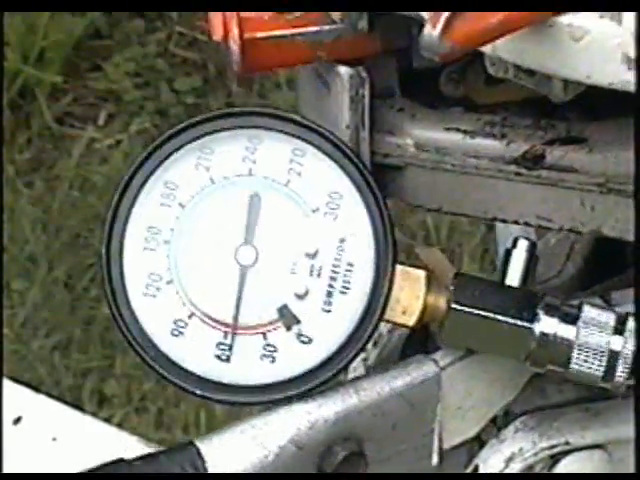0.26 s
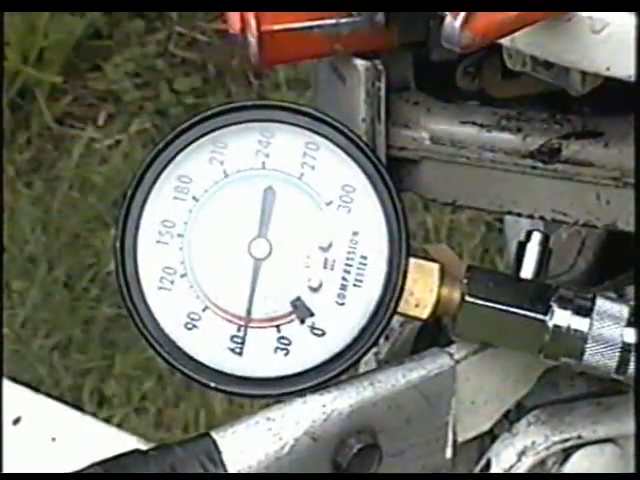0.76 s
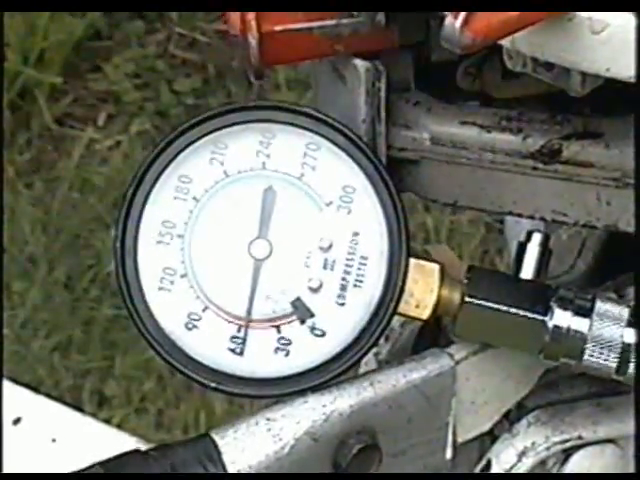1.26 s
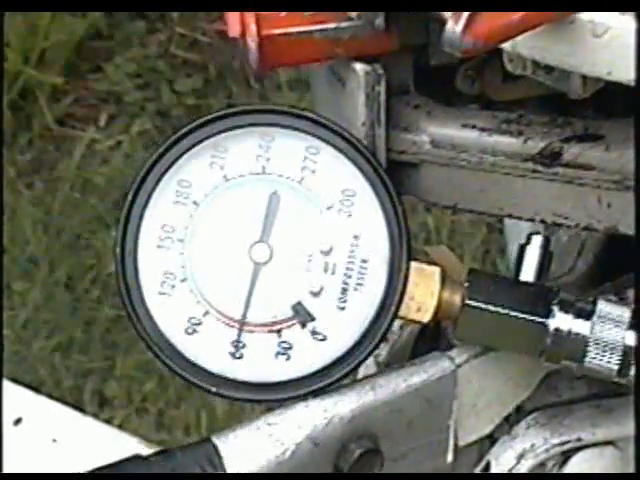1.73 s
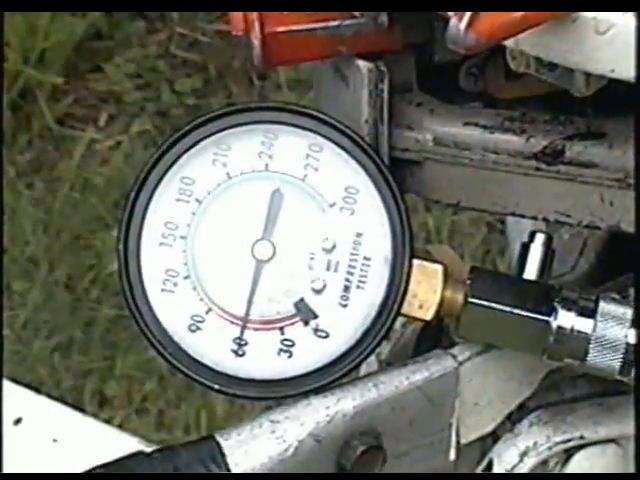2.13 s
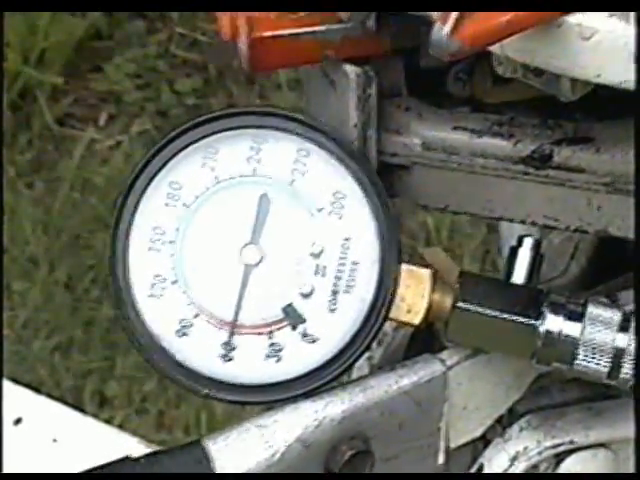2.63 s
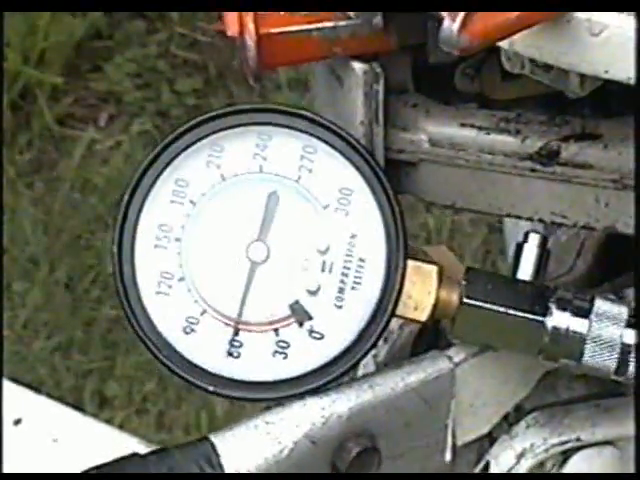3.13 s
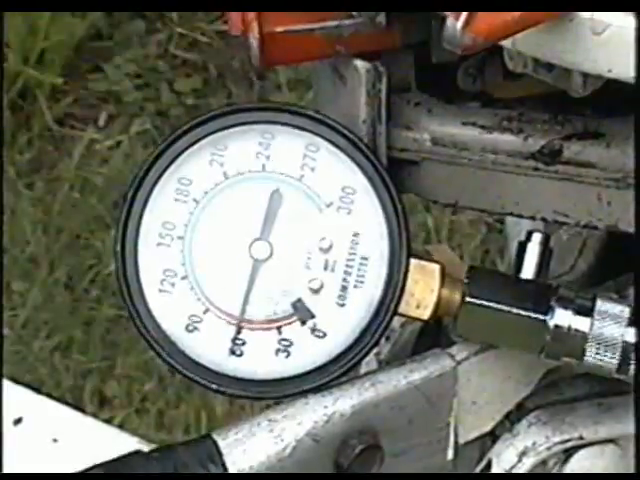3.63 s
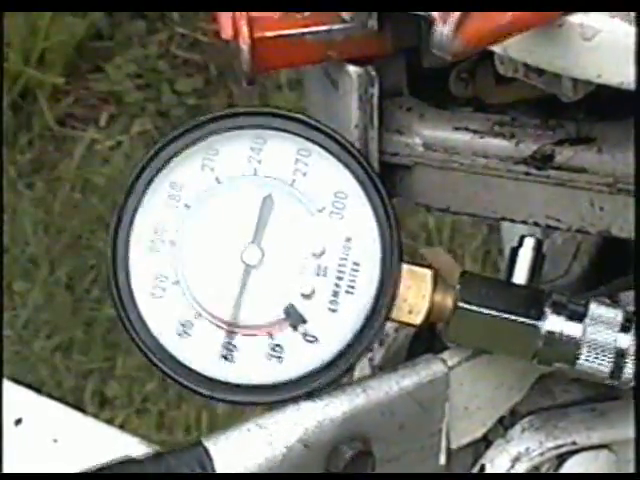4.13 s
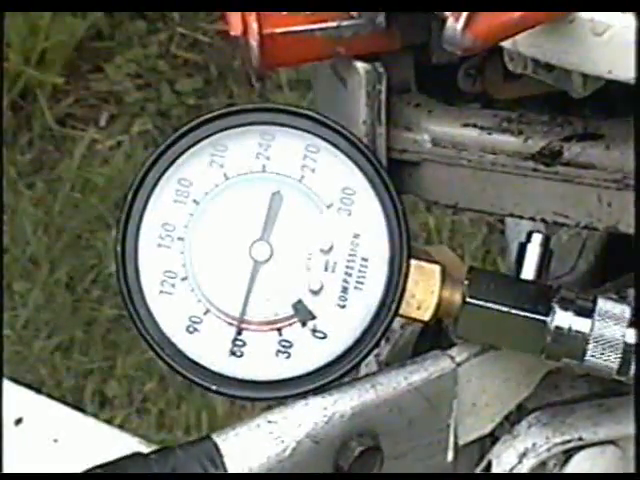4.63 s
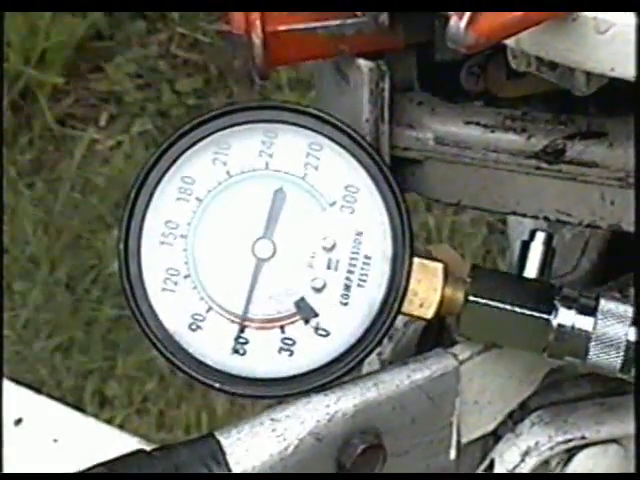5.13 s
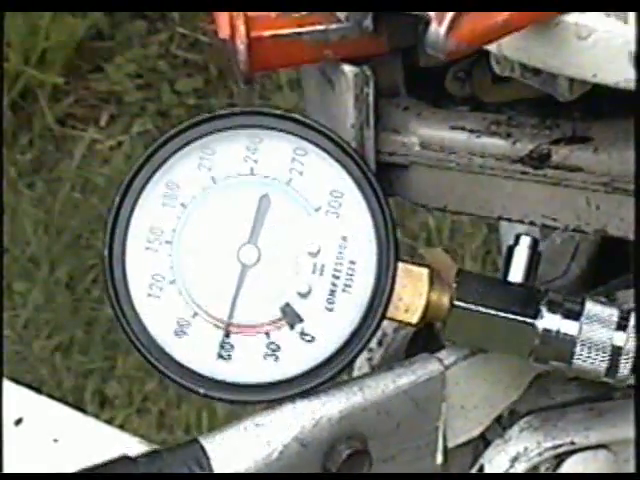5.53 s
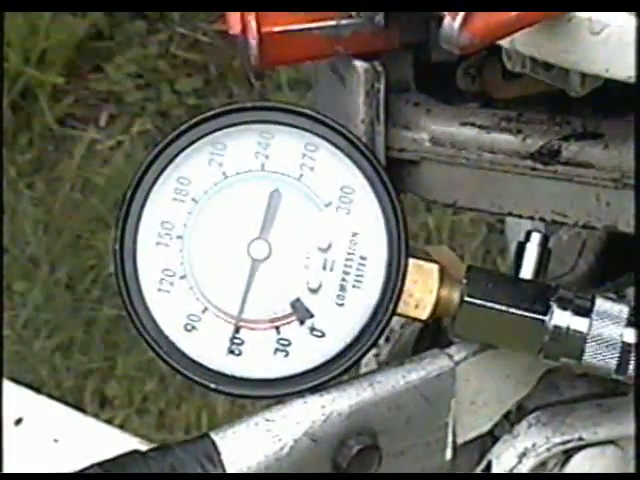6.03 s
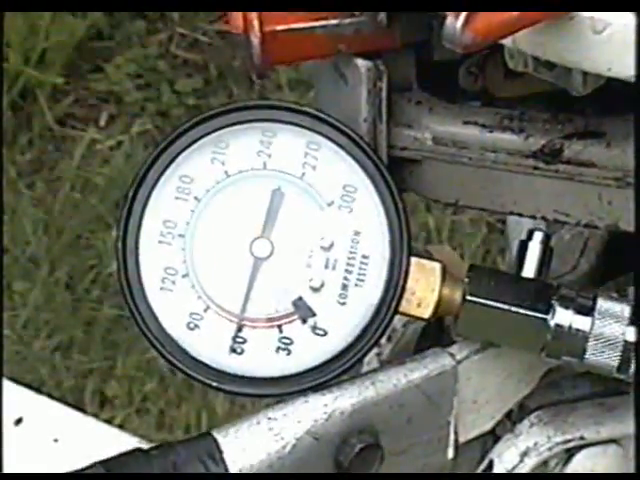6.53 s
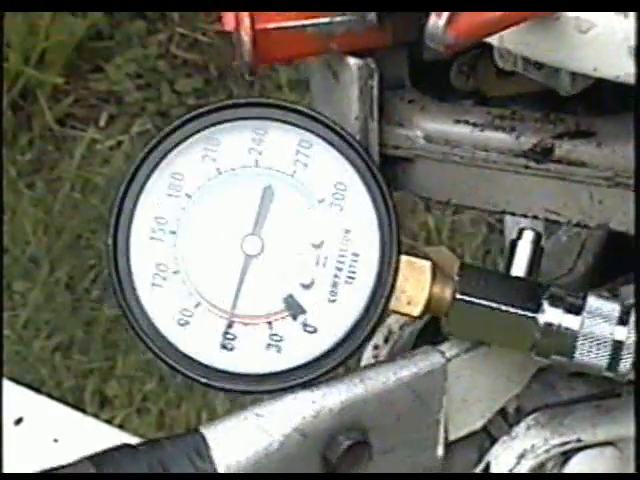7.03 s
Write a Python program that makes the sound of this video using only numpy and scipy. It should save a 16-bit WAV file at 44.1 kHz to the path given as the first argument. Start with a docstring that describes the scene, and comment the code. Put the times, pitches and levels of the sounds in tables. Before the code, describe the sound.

A hand-pulled starter rope whirrs and clacks six times on a small engine that never fires, each rewind scraping back to a knocking slap.

```python
"""Cranking a small outboard motor by hand

A small outboard motor is cranked six times by its recoil rope for a compression test and never fires.
Each pull whirrs as friction noise in the resonant starter housing, throbs in the exhaust's air column and
ends in a clack; gulped air chirps. The spring then drags the scraping, singing rope back, and five times the
handle slaps home on a ringing cowl. Quiet air and hum lie beneath; the sound cuts out briefly four times."""
import sys
import numpy as np
from scipy import signal
from scipy.fft import rfft, irfft
from scipy.io import wavfile
from scipy.ndimage import uniform_filter1d

SR = 44100
rng = np.random.default_rng(int(sys.argv[2]) if len(sys.argv) > 2 else 0)


def transcribe(u):
    """Save the signal u as a 16-bit wav file named by the first command-line argument.

    u: samples, shape (n,) or (channels, n), limited to [-1, 1]; the rate is SR.
    q: integer samples, one column per channel.
    """
    v = np.clip(np.atleast_2d(u).T, -1, 1)
    q = np.round(v * 32767).astype(np.int16)
    wavfile.write(sys.argv[1], SR, q)


N = 320739
TIME = np.arange(N) / SR

# Pulls of the rope: (start [s], time to reach speed [s], stop [s],
# relative rattle level [dB], relative rope hiss level [dB])
PULLS = [(0.146, 0.067, 0.47, -27.5, -33), (1.455, 0.057, 1.76, -29, -33),
         (2.733, 0.085, 3.014, -28.5, -31.5), (4.084, 0.11, 4.317, -27, -30),
         (5.42, 0.069, 5.718, -29.5, -32.5), (6.815, 0.097, 7.12, -28.5, -31.5)]
# Resonances of the starter housing: (frequency [Hz], width [Hz], lift [dB])
HOUSING = [(365.4, 58, 5.5), (401, 77, 3), (740, 24, 1.5), (830, 42, 1), (982, 65, 8.5), (1099, 40, 7),
           (1460, 72, 4.5), (1670, 50, 1.5), (2290, 64, 2), (2490, 220, 3.5), (6560, 560, 4.5),
           (7940, 140, 7)]
# Spectrum of the rewinding rope and reel: (frequency [Hz], relative density [dB])
SCRAPE_SPECTRUM = [(120, -51.5), (200, -10.5), (310, -22.5), (388, 1.5), (496, -6.5), (679, -10.5),
                   (1050, -4), (1210, -8.5), (1520, -6), (2040, -13), (2470, -7), (3450, -13.5), (6580, -8),
                   (10900, -21.5), (13000, -54)]


def amp(db):
    """Level definition: decibels to amplitude gain."""
    return 10 ** (np.asarray(db) / 20)


def unit(x):
    """Power normalisation: scales to rms 1."""
    return x / np.sqrt(np.mean(x ** 2) + 1e-20)


def read(points, hz):
    """Interpolates a table along a logarithmic frequency axis."""
    f, value = np.transpose(points)
    return np.interp(np.log(hz + 1), np.log(f + 1), value)


def add(mix, s, sound):
    """Superposition: adds a sound to the mix from time s."""
    part = mix[max(round(s * SR), 0):][:len(sound)]
    part += sound[:len(part)]


def wander(hz):
    """Low-passed noise: a slow random fluctuation of rms 1, up to about hz."""
    spectrum = rfft(rng.standard_normal(N))
    lowpass = 1 / (1 + (np.fft.rfftfreq(N, 1 / SR) / hz) ** 4)
    return unit(irfft(spectrum * lowpass, N))


def band(x, hz, kind):
    """Butterworth filtering: low-pass or high-pass at hz."""
    return signal.sosfilt(signal.butter(4, hz, kind, fs=SR, output="sos"), x)


def ease(s, rise):
    """Gaussian onset: leaves 0 at time s and nears 1 in about rise seconds."""
    return 1 - np.exp(-(np.maximum(TIME - s, 0) / rise) ** 2)


def release(s, t60):
    """Exponential decay: holds at 1 until time s, then falls 60 dB in t60 seconds."""
    return np.exp(-np.log(1000) * np.clip((TIME - s) / t60, 0, 2))


def colour(x, spectrum, resonances=(), size=8192):
    """Minimum-phase filtering: a broad spectrum with resonances on top, of energy 1."""
    hz = np.fft.rfftfreq(size, 1 / SR)
    db = read(spectrum, hz)
    db = db + sum(lift / (1 + (2 * (hz - f) / width) ** 2) for f, width, lift in resonances)
    log_gain = np.log(amp(np.r_[db, db[-2:0:-1]]))
    # the Hilbert transform of the log gain supplies the phase of a causal filter
    taps = np.fft.ifft(np.exp(np.conj(signal.hilbert(log_gain)))).real[:size // 2]
    return signal.oaconvolve(x, taps / np.linalg.norm(taps))[:N]


def resonate(x, hz, width):
    """Heterodyning: a resonance of gain 1 whose centre follows the curve hz."""
    turn = np.exp(2j * np.pi * np.cumsum(hz) / SR)
    r = np.exp(-np.pi * width / SR)
    shifted_down = signal.lfilter([1 - r], [1, -r], x / turn)
    return 2 * (turn * shifted_down).real


def note_of(hz, width):
    """Narrow-band noise: two equal resonances in series make a fuzzy note."""
    once = resonate(rng.standard_normal(N), hz, width)
    return unit(resonate(once, hz, width))


def grains(per_s, spread_db, flutter_db, flutter_hz):
    """Dry friction as shot noise: dense tiny clicks of uneven size that come in clumps."""
    size = amp(spread_db * np.minimum(rng.exponential(1, N), 4)) * rng.standard_normal(N)
    struck = rng.random(N) < per_s / SR
    return unit(size * struck * amp(flutter_db * wander(flutter_hz)))


def tinkle(per_s, width):
    """Impulsive excitation: scattered contacts ring at 18 gently wavering pitches, per_s on each."""
    total = np.zeros(N)
    for hz in np.linspace(700, 9500, num=18):
        size = amp(2 * np.minimum(rng.exponential(1, N), 4))
        contacts = size * (rng.random(N) < per_s / SR) * rng.choice([-1., 1.], N)
        waver = np.sin(2 * np.pi * (rng.uniform(3, 9) * TIME + rng.random()))
        total += resonate(contacts, hz * (1 + .06 * waver), width)
    return unit(total)


def rubbing(drive, spectrum, body_gain, hiss_gain):
    """Friction filtered by the housing's resonances; body and hiss follow their own levels."""
    sound = colour(drive, spectrum, HOUSING)
    body, hiss = band(sound, 3500, "low"), band(sound, 3500, "high")
    return body_gain * unit(body) + hiss_gain * unit(hiss)


def blows(rows, t60, chatter_db, chatter_t60, rise):
    """Impact as a two-rate decay: a short crack followed by chatter of loose parts."""
    t, out = np.arange(SR // 5) / SR, np.zeros(N)
    fall = amp(-60 * t / t60) + amp(chatter_db - 60 * t / chatter_t60)
    for s, db, *treble_db in rows:
        noise = np.tanh(2 * rng.standard_normal(len(t)))
        burst = amp(db) * fall * (1 - np.exp(-t / rise)) * noise
        dull = signal.lfilter(*signal.butter(1, 2500, fs=SR), burst)
        add(out, s, dull + amp(sum(treble_db)) * (burst - dull))
    return out


def background():
    """Stationary noise and frequency modulation: outdoor air with a faint wavering hum and whine."""
    # spectrum of the air: (frequency [Hz], relative density [dB])
    air_spectrum = [(12, -48), (20, 2), (185, -2.5), (211, -21.5), (255, -7.5), (317, -16.5), (354, -7),
                    (428, -9.5), (660, -5.5), (797, -17.5), (865, -6), (2630, -20.5), (8660, -24),
                    (12000, -23), (13000, -25.5)]
    # faint steady-level tones: (frequency [Hz], rms level [dB])
    hum = [(180, -71), (362, -67), (642, -73.5), (3240, -79), (3960, -76.5), (4160, -89), (4490, -80),
           (5220, -82.5), (5570, -89)]
    air = amp(-52) * unit(colour(rng.standard_normal(N), air_spectrum)) * amp(1.4 * wander(0.7))
    tones = sum(amp(db) * np.sin(2 * np.pi * np.cumsum(hz + 4 * wander(15.2)) / SR) for hz, db in hum)
    return air + np.sqrt(2) * tones


def pull():
    """Friction and rattle: the rope runs out through its guide while starter and crank turn."""
    # spectrum of the whirr: (frequency [Hz], relative density [dB])
    whirr_spectrum = [(100, -47.5), (170, -9), (223, -10.5), (309, -8.5), (371, 0.5), (505, -8), (971, -7),
                      (1210, -7), (2490, -13), (4220, -22), (6520, -19), (9900, -26), (13000, -58)]
    hiss_sag_db_per_s = 20.5  # the rope hisses less as the arm runs out of reach
    rattle_t60, hiss_t60 = 0.24, 0.09  # [s] after the pull stops
    rattle, hiss = np.zeros(N), np.zeros(N)
    for start, rise, stop, rattle_db, hiss_db in PULLS:
        speed = ease(start, rise)
        rattle += amp(rattle_db) * speed * release(stop, rattle_t60)
        sag_db = hiss_sag_db_per_s * np.maximum(TIME - start, 0)
        hiss += amp(hiss_db - sag_db) * speed * release(stop, hiss_t60)
    friction = grains(per_s=9000, spread_db=-0.5, flutter_db=2.4, flutter_hz=118)
    drive = friction + amp(-4.5) * tinkle(per_s=80, width=95)
    return rubbing(unit(drive), whirr_spectrum, amp(-2.5) * rattle, amp(-1.5) * hiss)


def slips(scrape, count=90):
    """Stick-slip: rope and spring coils jump in a few loud ticks and many lesser ones under the scrape."""
    # the loudest slips: (time [s], relative level [dB])
    loud_slips = [(.166, -23.5), (.6515, -21), (.7545, -25), (.8777, -39), (.942, -27), (1.1183, -27),
                  (1.2012, -25), (1.461, -21.5), (1.8997, -20.5), (2.0634, -31), (2.7576, -30.5),
                  (3.2378, -23), (3.4044, -43), (3.692, -31.5), (3.7692, -29), (4.5775, -22), (5.0464, -31),
                  (5.4435, -26), (5.9419, -22.5), (6.351, -32)]
    small_per_s, small_db = 12, 12.5  # mean rate; level relative to the scrape gain
    gap, chance_db = rng.uniform(0, 2, count), rng.normal(0, 2.6, count)
    times = np.cumsum(gap) / small_per_s
    scrape_db = 20 * np.log10(np.interp(times, TIME, scrape) + 1e-9)
    small_slips = list(zip(times, scrape_db + small_db + chance_db))
    ticks = blows(list(loud_slips) + small_slips, t60=0.042, chatter_db=-13, chatter_t60=0.029, rise=0.0017)
    return colour(band(ticks, 1230, "high"), SCRAPE_SPECTRUM, HOUSING)


def clacks():
    """Impact and resonance: metal knocks ring the starter housing."""
    # pawls catching, knocks of the turning crank and the clack that ends each pull:
    # (time [s], relative level [dB], relative treble [dB])
    knocks = [(0.206, -20.5, 9.5), (0.306, -13.5, -11), (0.457, -7.5, 3), (0.468, -15.5, 8),
              (1.462, -17.5, -15), (1.516, -20, 7), (1.718, -7.5, 5.5), (1.736, -32, -6),
              (2.797, -21, 10.5), (2.826, -24, -13), (3.026, -10.5, 3), (3.038, -8.5, 7),
              (4.149, -24.5, 13), (4.359, -11, 7.5), (4.37, -20, 8), (5.481, -16.5, 5.5), (5.618, -13.5, 5),
              (5.63, -20, 10.5), (5.717, -11.5, 10.5), (6.853, -22, 0), (7.119, -14, 12)]
    # spectrum of a knock: (frequency [Hz], relative density [dB])
    knock_spectrum = [(100, -19), (250, -6), (400, -7), (550, -1.5), (1000, 2.5), (1600, -0.5),
                      (2800, -4.5), (4000, -12), (5500, -18), (7500, -17.5), (9500, -25.5), (12000, -43)]
    struck = blows(knocks, t60=0.029, chatter_db=-9.5, chatter_t60=0.099, rise=0.0017)
    return amp(-6.0) * colour(struck, knock_spectrum, HOUSING)


def exhaust(hz=90.76, t60=0.29, rise=0.0023, count=5):
    """Air-column resonance: each puff sets the exhaust swinging at its own low note."""
    # runs of puffs, one for each turn of the crank: (first puff [s], length [s], quickest turn [s],
    # relative level [dB], fall per puff [dB], relative level of the last puff at the stop [dB])
    throbs = [(0.24, .16, .0425, -15.5, .5, -26.5), (1.551, .17, .0445, -16, 2.7, -34),
              (2.831, .21, .0435, -16.5, 1.5, -31), (4.189, .13, .045, -15.5, 3, -23),
              (5.517, .16, .0425, -17, .5, -49), (6.902, .21, .044, -16.5, 0.9, -28)]
    turn_stretch = 0.1143  # the crank is quickest in mid-pull
    last_puff_lead = 0.0078  # [s] a last weak puff comes just before the crank stops
    t, out = np.arange(SR // 2) / SR, np.zeros(N)
    swing = np.sin(2 * np.pi * hz * t) * amp(-60 * t / t60) * (1 - np.exp(-t / rise))
    from_middle = (np.arange(count - 1) - (count - 2) / 2) ** 2
    turns = np.r_[0, np.cumsum(1 + turn_stretch * (from_middle - from_middle.min()))]
    for (first, length, turn_s, db, fall_db, last_db), (_, _, stop, _, _) in zip(throbs, PULLS):
        for k, delay in enumerate(turn_s * turns):
            add(out, first + delay, (delay < length) * amp(db - fall_db * k) * swing)
        add(out, stop - last_puff_lead, amp(last_db) * swing)
    flow = uniform_filter1d(abs(out), size=900)
    flow_spectrum = [(20, -23), (45, -15), (70, 8), (120, -16), (160, -6), (230, -23), (500, -39.5)]
    turbulence = unit(colour(rng.standard_normal(N), flow_spectrum))
    pipe = amp(0.5) * out + amp(-15.0) * flow * turbulence
    # the open end radiates little deep bass
    return signal.sosfilt(signal.butter(2, 48, "high", fs=SR, output="sos"), pipe)


def gulps(low_hz=950, glide_hz_per_s=48000, width=220, length=0.041):
    """Cavity resonance: air squeezed past the piston chirps upward as the cavity shrinks."""
    # gulps of air: (time, 4 ms after the onset [s], relative level [dB])
    gulp_rows = [(0.303, -17), (0.372, -26), (1.516, -21), (1.567, -19), (1.694, -20), (2.795, -24),
                 (2.892, -21.5), (2.985, -18), (4.15, -26), (4.281, -27), (5.532, -30), (5.616, -28),
                 (5.67, -21), (7.009, -23)]
    t, out = np.arange(0, length, 1 / SR), np.zeros(N)
    hz = low_hz + glide_hz_per_s * t
    envelope = signal.windows.tukey(len(t), .4) * np.exp(-t / length)
    for s, db in gulp_rows:
        chirp = resonate(resonate(rng.standard_normal(len(t)), hz, width), hz, width)
        add(out, s - .004, amp(db) * unit(chirp) * envelope)
    return amp(-12.5) * out


def reel():
    """Load-dependent friction: scrape and hiss gains swell each turn and fade as the spring unwinds."""
    # rewinds: (start [s], spring takes up the rope [s], end [s], one turn of the reel [s],
    # relative level [dB], fade [dB per s])
    rewinds = [(0.448, 0.666, 1.19, 0.1, -41.5, 16.5), (1.73, 1.903, 2.32, 0.09, -41, 24),
               (3.01, 3.24, 3.635, 0.095, -44, 18), (4.393, 4.58, 5.01, 0.088, -45.5, 20.5),
               (5.738, 5.941, 6.42, 0.09, -46, 16.5), (7.135, 7.33, 7.7, 0.099, -48, 22)]
    slack_db, slack_hiss_db = -0.5, -5  # while the rope is still slack
    take_up, run_out = 0.077, 0.088  # [s] the reel gathers speed, and slows as the rope runs out
    swell_depth_db, uneven_db = 2, 1.5  # the reel rubs harder once in each turn; random unevenness
    scrape, hiss = np.zeros((2, N))
    for start, taut, end, turn_s, db, fade in rewinds:
        running = ease(start, take_up) * (1 - ease(end - run_out, run_out))
        load = ease(taut - take_up, take_up)
        swell_db = swell_depth_db * load * np.cos(2 * np.pi * (TIME - taut) / turn_s)
        spring = running * amp(db + swell_db - fade * np.maximum(TIME - taut, 0))
        scrape += spring * amp(slack_db * (1 - load))
        hiss += spring * amp(slack_hiss_db * (1 - load))
    uneven = amp(uneven_db * wander(17))
    return scrape * uneven, hiss * uneven


def rubs():
    """Friction-driven tone: gain and pitch of rubs that swell, glide upward and let go."""
    # the reel rubs against its housing and sings: (start [s], length [s], relative level [dB])
    rub_rows = [(0.677, 0.11, -41), (0.832, 0.045, -43), (0.896, 0.077, -36), (1.086, 0.049, -40),
                (1.885, 0.11, -39.5), (2.073, 0.12, -40), (3.218, 0.068, -40), (3.295, 0.067, -47),
                (3.396, 0.04, -51), (3.457, .1, -44), (4.589, 0.09, -38.5), (4.73, 0.047, -45),
                (4.778, 0.077, -43), (5.943, 0.142, -43), (6.098, 0.091, -42.5), (6.194, 0.047, -49),
                (6.345, 0.056, -45)]
    note_hz, glide_hz = 1038, 110  # mean pitch and its rise during one rub
    gain, hz = np.zeros(N), note_hz * np.ones(N)
    for s, length, db in rub_rows:
        u = np.linspace(0, 1, round(length * SR))
        add(gain, s, amp(db) * 2 * np.sqrt(u * (1 - u)))
        add(hz, s, glide_hz * (u - .5))
    return gain, hz


def rewind():
    """Friction noise and tones: the spring drags the rope back, the reel sings and the coils slip."""
    # the rope swishing through its guide as it tightens and as its last length runs in:
    # (time [s], relative level [dB])
    swishes = [(.638, -38.5), (1.088, -40), (1.886, -39), (2.31, -55), (3.226, -40), (3.685, -42.5),
               (4.566, -45.5), (4.935, -44), (5.928, -41), (6.345, -39)]
    swish_rise, swish_hold, swish_t60 = 0.0061, 0.018, 0.12  # [s]
    (body, hiss), (rub, hz) = reel(), rubs()
    body = body + amp(-17) * rub  # each rub also adds scrape
    swish = sum(amp(db) * ease(s, swish_rise) * release(s + swish_hold, swish_t60) for s, db in swishes)
    friction = grains(per_s=6000, spread_db=0.0, flutter_db=2.5, flutter_hz=44.2)
    drive = friction + amp(-6.0) * tinkle(per_s=70, width=72)
    body_gain = amp(-3.0) * body + amp(-4) * swish
    hiss_gain = amp(-3.5) * hiss + amp(-8.5) * swish
    scrape = rubbing(unit(drive), SCRAPE_SPECTRUM, body_gain, hiss_gain)
    note_hz = hz + 20 * wander(22)
    overtone = note_of(2.44 * note_hz, width=110)
    drone_phase = 2 * np.pi * np.cumsum(393 + 12 * wander(25.4)) / SR
    drone = amp(1.8 * wander(13)) * np.sin(drone_phase)
    note_gain = amp(-6.5) * rub + amp(-9.5) * body  # the note stays faintly present between rubs
    notes = note_gain * note_of(note_hz, width=130)
    notes += body * (amp(-10.5) * overtone + amp(-10.0) * drone)
    return scrape + notes + amp(-3.5) * slips(body)


def handle(bounce_s=.007, bounce_db=-3):
    """Impact and modal decay: the handle hits, bounces once and rings the cowl a little differently each time."""
    # the handle slapping home: (time [s], relative level [dB], relative treble [dB])
    slaps = [(1.215, -10, -5), (2.413, -11, -0.5), (3.779, -11.5, -4.5), (5.053, -12, -2.5),
             (6.47, -9.5, -4)]
    # modes of the cowl under the handle: (frequency [Hz], relative level [dB], t60 [s])
    modes = [(367, -18, 0.9), (391.8, -1, 0.11), (457, -13.5, 0.05), (565, -5.5, 0.057), (588, -12, 0.56),
             (641.7, -15, 0.6), (671, -12.5, 0.4), (707, -7, 0.19), (736, 3, 0.082), (750, -23.5, 0.8),
             (995, -5, 0.13), (1078, 3, 0.088), (1353, -5, 0.11), (1430, -15, 0.11), (1547, -9, 0.14)]
    # spectrum of the slap: (frequency [Hz], relative density [dB])
    slap_spectrum = [(70, -26), (140, -7.5), (260, -13), (400, -3), (620, -1), (850, -7), (1100, -7.5),
                     (1900, -11.5), (3000, -7), (4200, -17), (6600, -13.5), (9000, -21), (12000, -39)]
    t, cowl = np.arange(SR) / SR, np.zeros(N)
    for s, db, _ in slaps:
        ring = np.zeros(SR)
        for hz, mode_db, t60 in modes:
            decay = amp(mode_db + rng.standard_normal() - 60 * t / t60)
            ring += decay * np.sin(2 * np.pi * (hz * t + rng.random()))
        add(cowl, s, amp(db) * ring * (1 - np.exp(-t / .001)))
    bounces = [(s + bounce_s, db + bounce_db, treble_db) for s, db, treble_db in slaps]
    hits = blows(list(slaps) + bounces, t60=0.031, chatter_db=-12, chatter_t60=0.11, rise=0.0015)
    return amp(-3.5) * colour(hits, slap_spectrum) + amp(-16.0) * cowl


def room(x, count=1600, size=20):
    """Reverberation: sparse reflections of random sign, each band decaying at its own rate."""
    # decay of the surroundings: (frequency [Hz], t60 [s])
    decay_times = [(100, 0.73), (400, 0.28), (700, 0.32), (1500, 0.33), (3000, 0.19), (7000, 0.19),
                   (12000, 0.14)]
    taps = np.zeros(SR)
    slots = size * (np.arange(count) + size)
    taps[slots + rng.integers(0, size, count)] = rng.choice([-1., 1.], count)
    hz, t, z = signal.stft(taps, SR, nperseg=256)
    decay = amp(-60 * t / read(decay_times, hz)[:, None])
    tail = signal.istft(z * decay, SR, nperseg=256)[1]
    return signal.fftconvolve(x, tail / np.linalg.norm(tail))[:N]


def scene():
    """Superposition: the close motor in near mono, with weak reflections."""
    starter = pull() + gulps() + rewind() + clacks() + handle()
    mono = starter + amp(-13.0) * room(starter) + exhaust() + background()
    # the channels differ only faintly
    spread = amp(-40) * room(band(starter, 2240, "high")) + amp(-77.5) * rng.standard_normal(N)
    return np.array([mono + spread, mono - spread])


def record(dry):
    """Gating and linear-phase low-pass filtering: brief dropouts, then a 12.8 kHz band limit."""
    # the sound cuts out: (from [s], to [s])
    gaps = [(1.031, 1.085), (3.539, 3.575), (6.283, 6.318), (7.027, 7.081)]
    live = 1. - sum((TIME > start) & (TIME < end) for start, end in gaps)
    live = uniform_filter1d(live, size=40)  # softens the edges of each gap
    lowpass = signal.firwin(511, 12800, window=("kaiser", 9), fs=SR)
    return signal.oaconvolve(dry * live, lowpass[None], "same")


dry = scene()
out = record(dry)
transcribe(out)
```